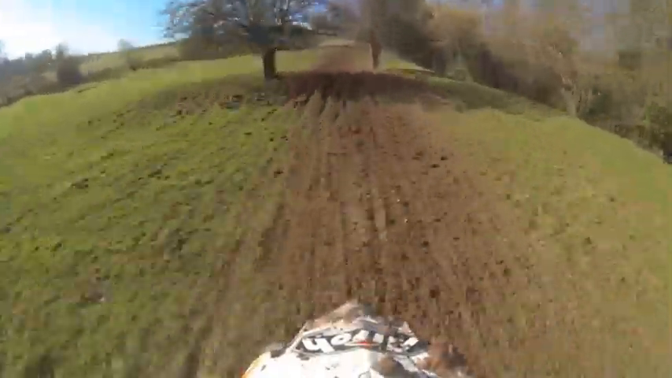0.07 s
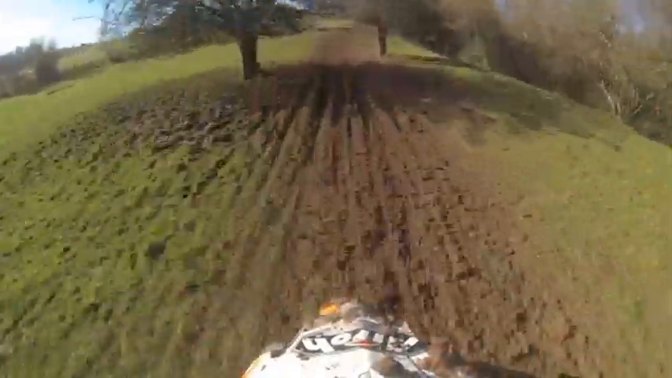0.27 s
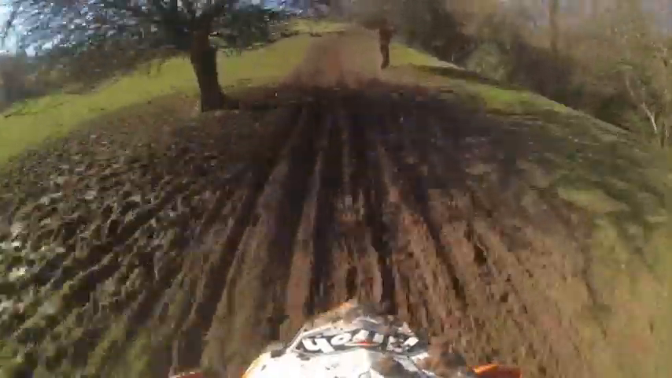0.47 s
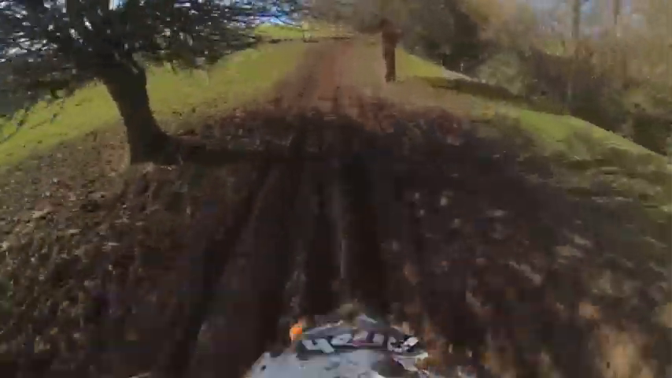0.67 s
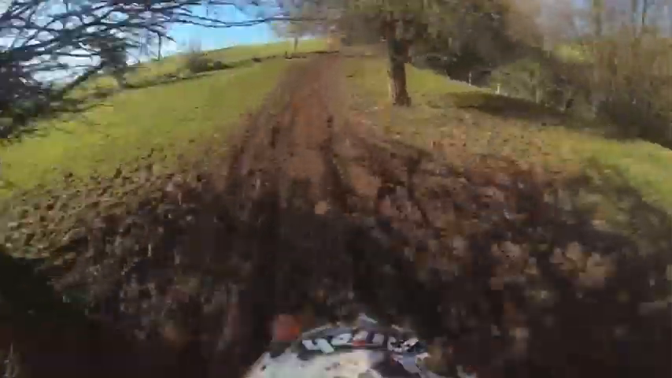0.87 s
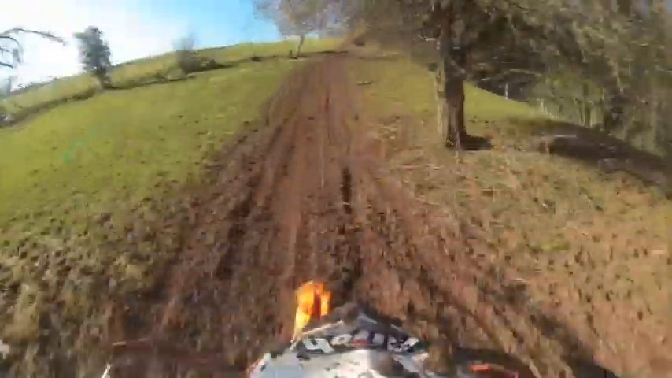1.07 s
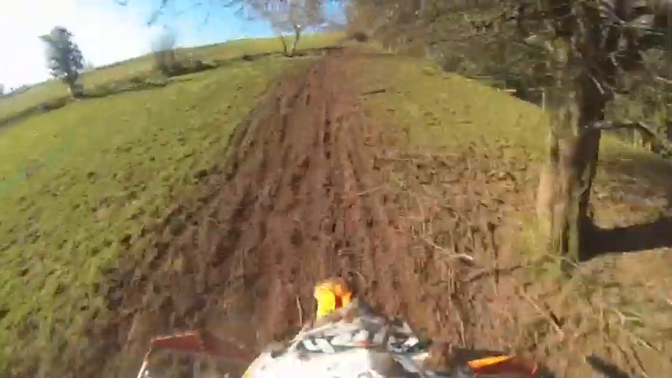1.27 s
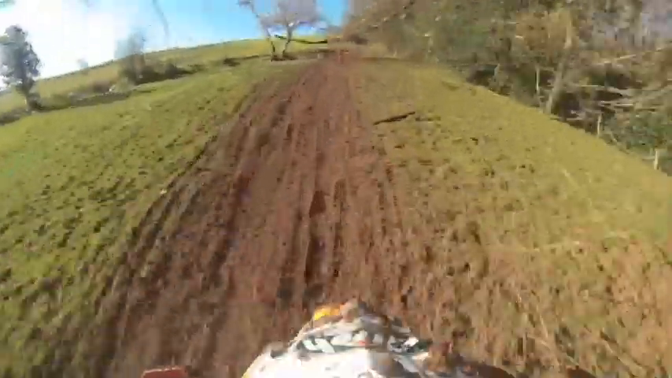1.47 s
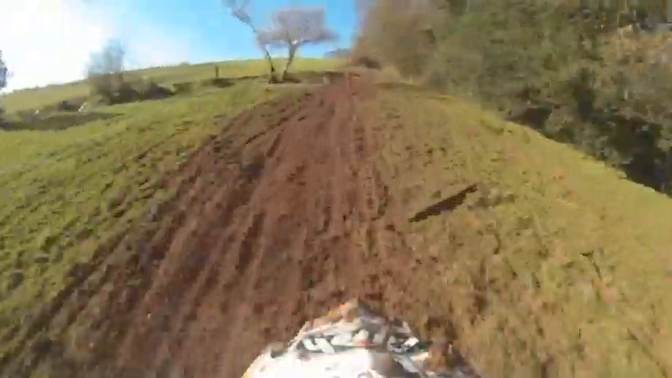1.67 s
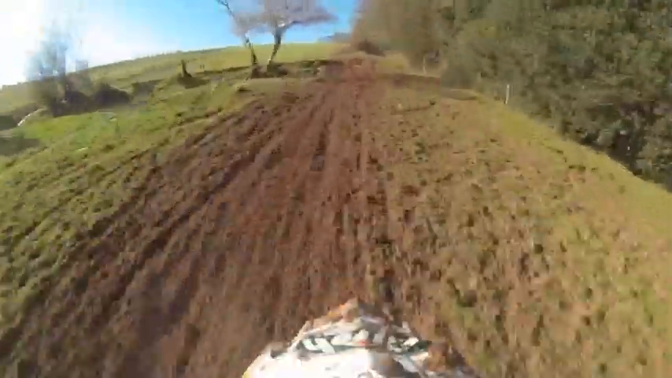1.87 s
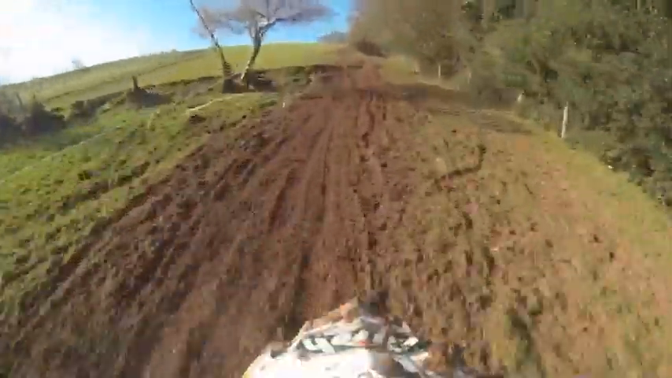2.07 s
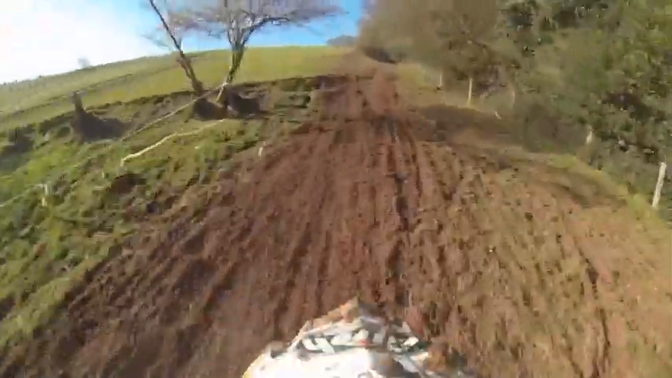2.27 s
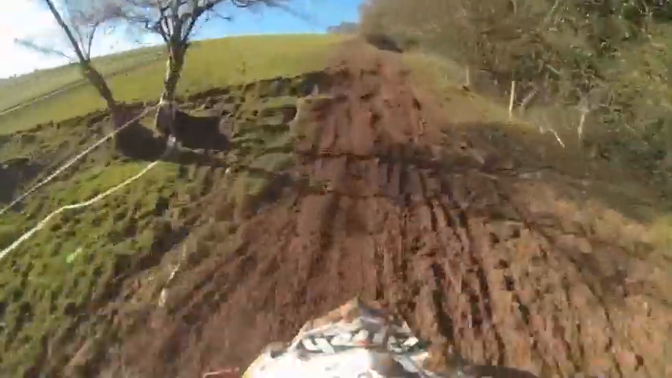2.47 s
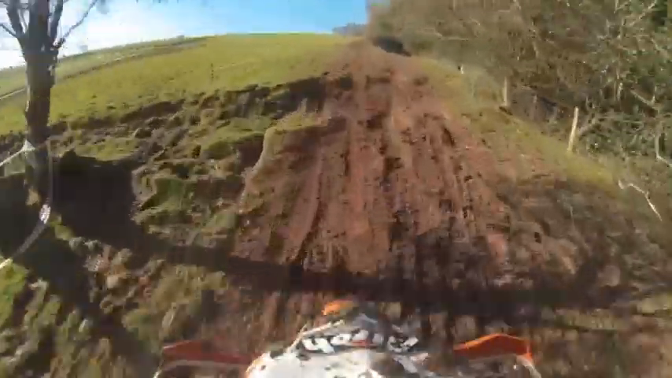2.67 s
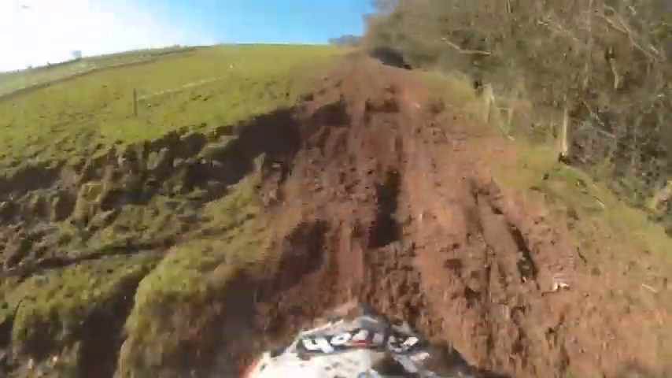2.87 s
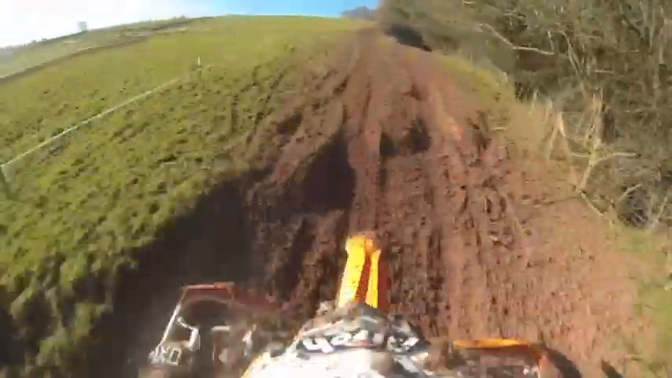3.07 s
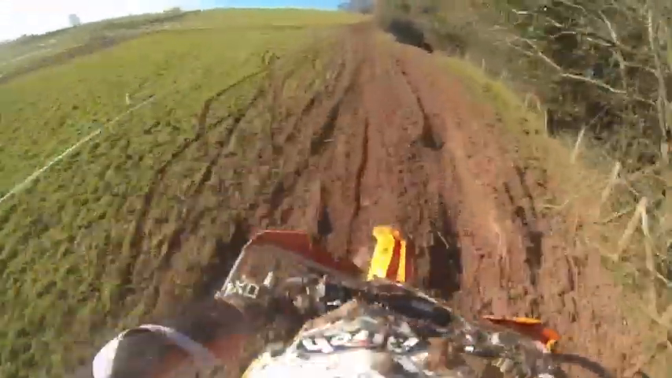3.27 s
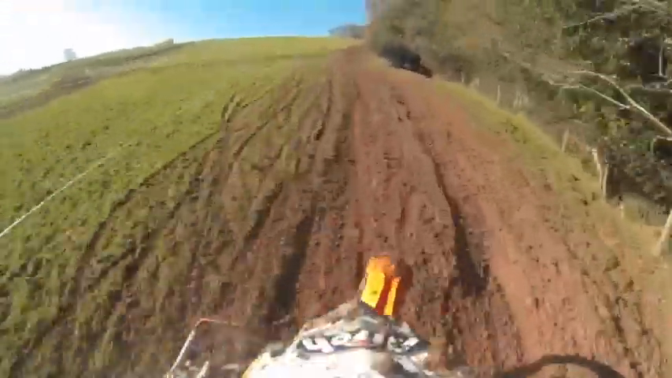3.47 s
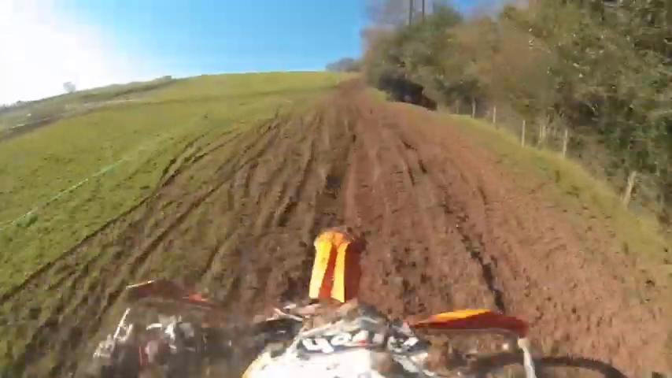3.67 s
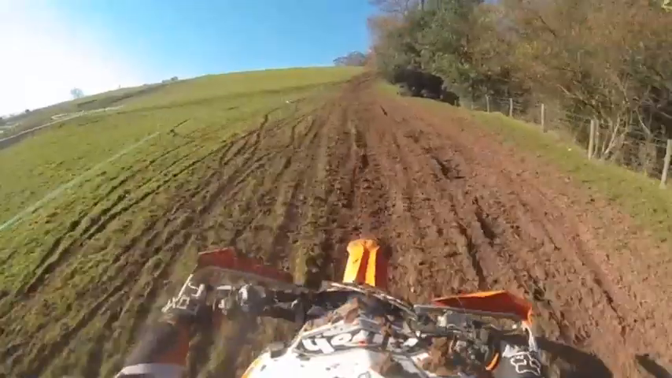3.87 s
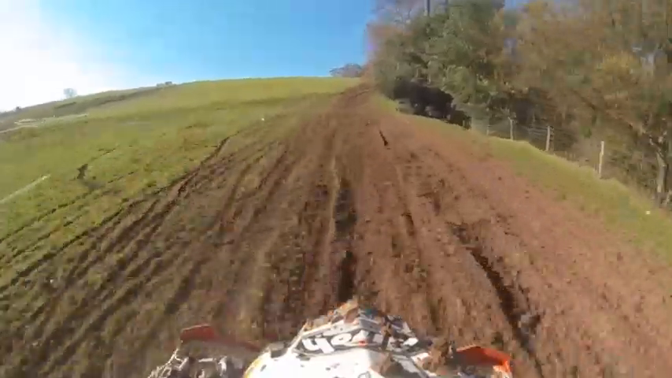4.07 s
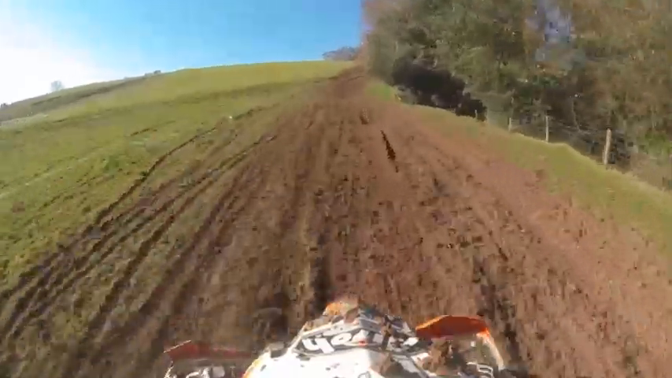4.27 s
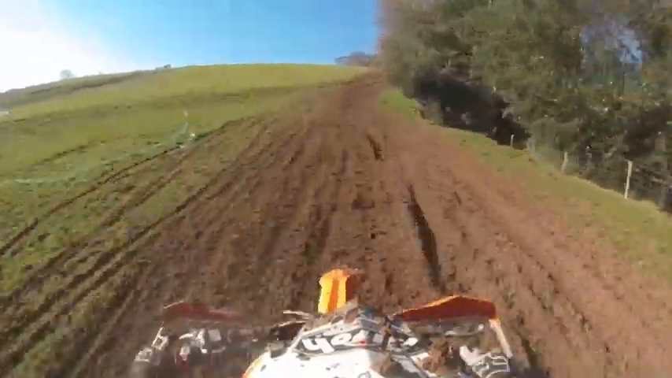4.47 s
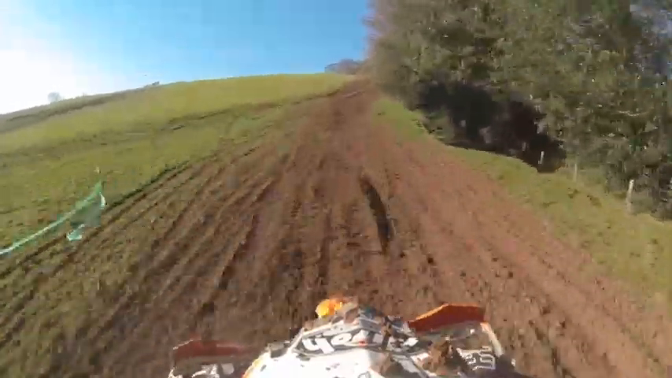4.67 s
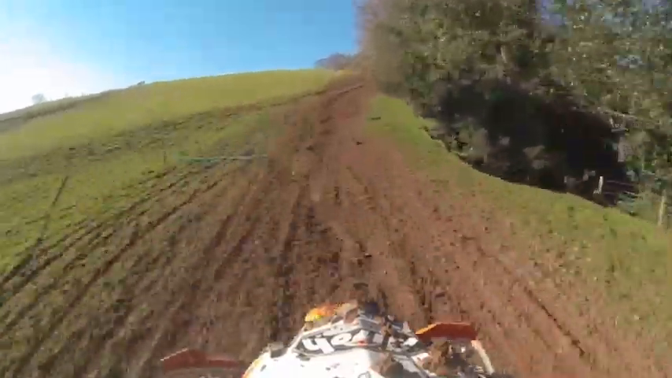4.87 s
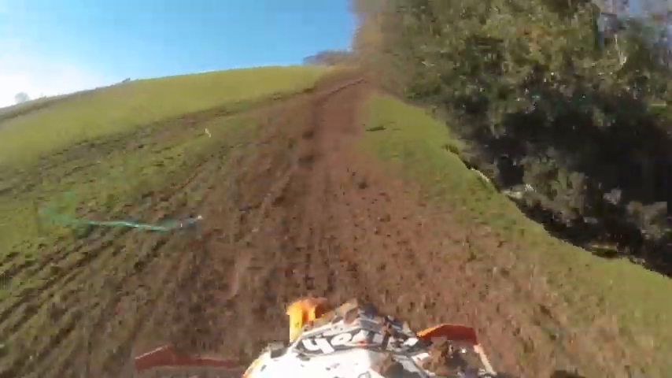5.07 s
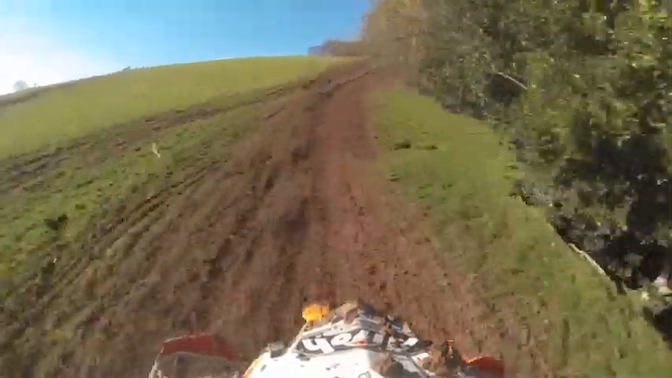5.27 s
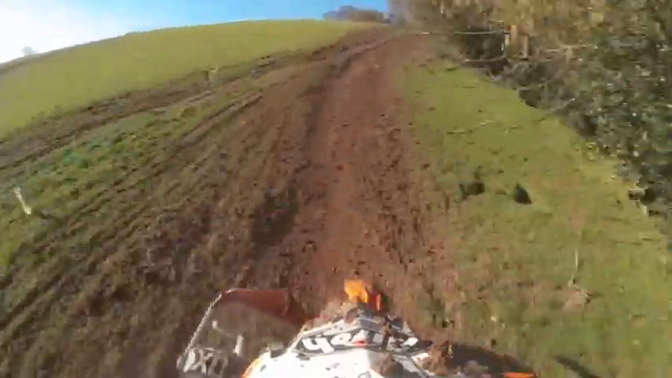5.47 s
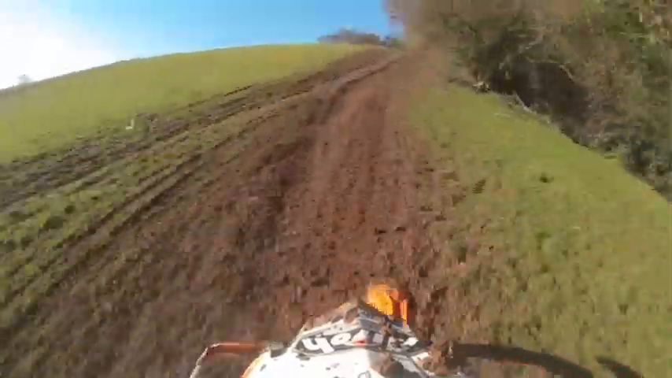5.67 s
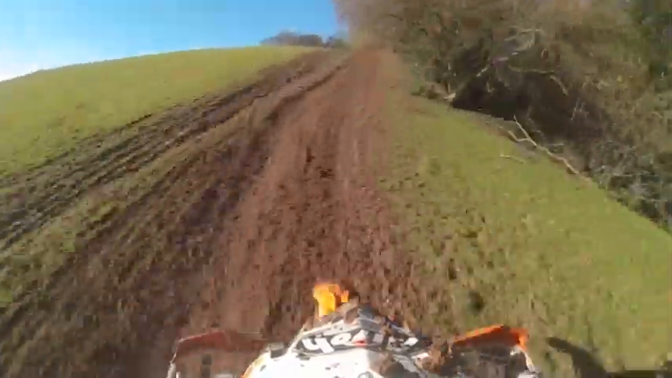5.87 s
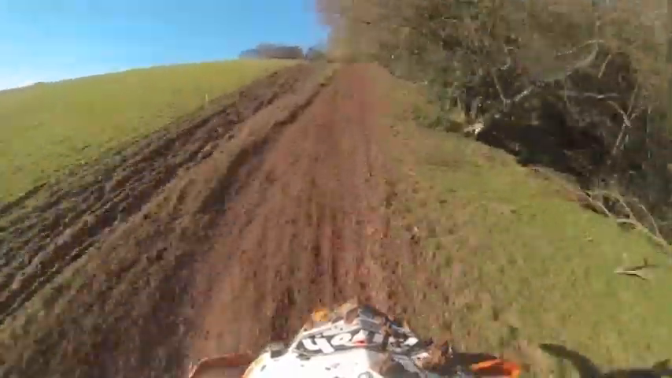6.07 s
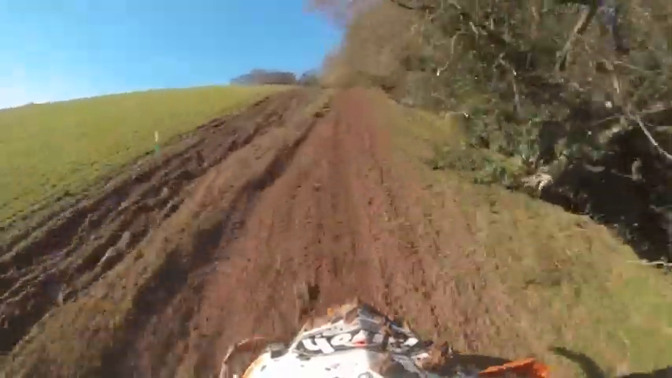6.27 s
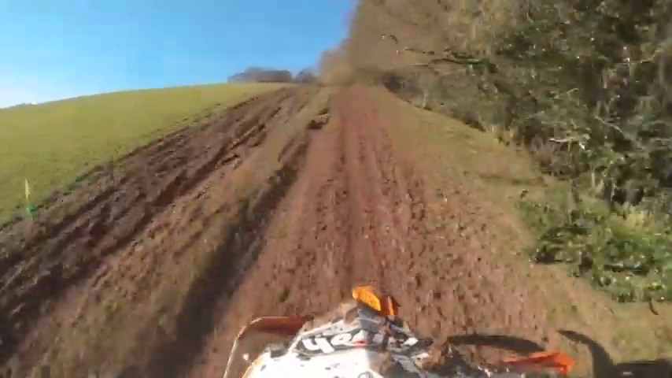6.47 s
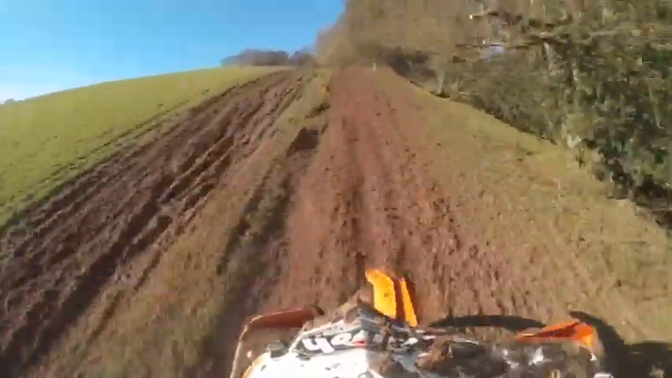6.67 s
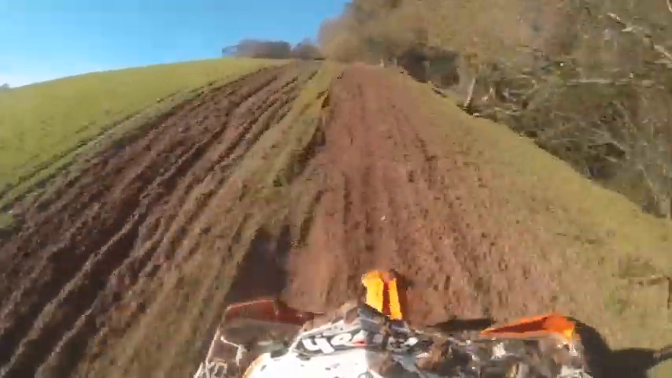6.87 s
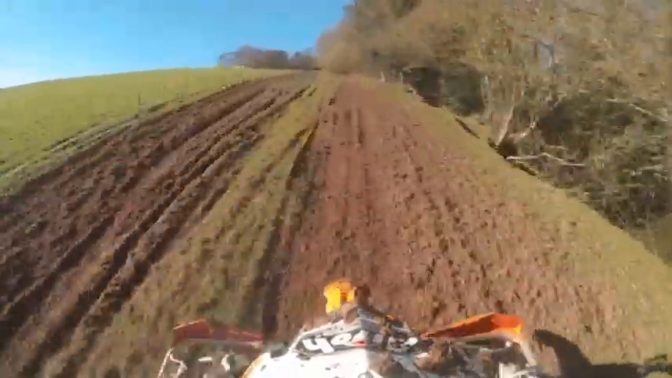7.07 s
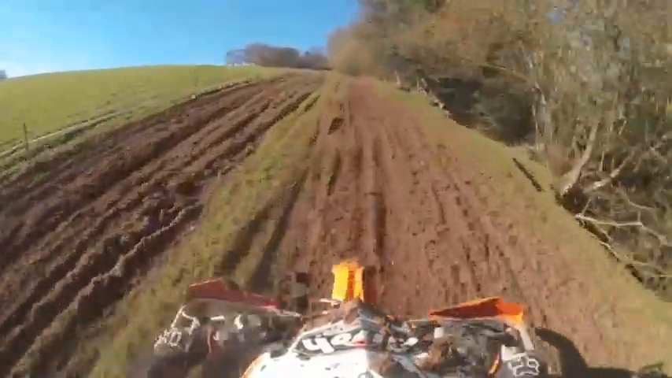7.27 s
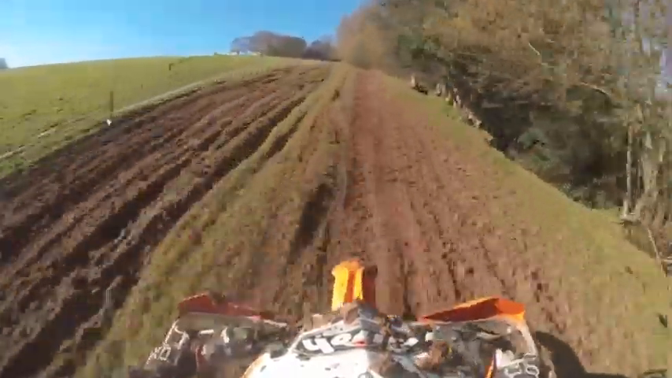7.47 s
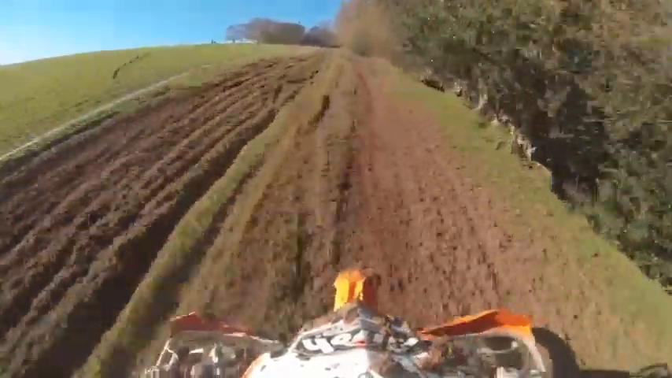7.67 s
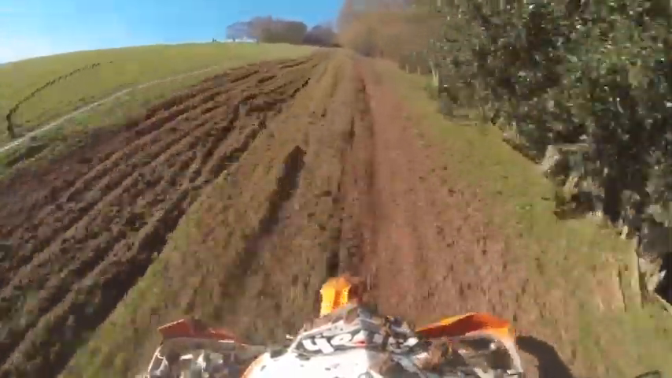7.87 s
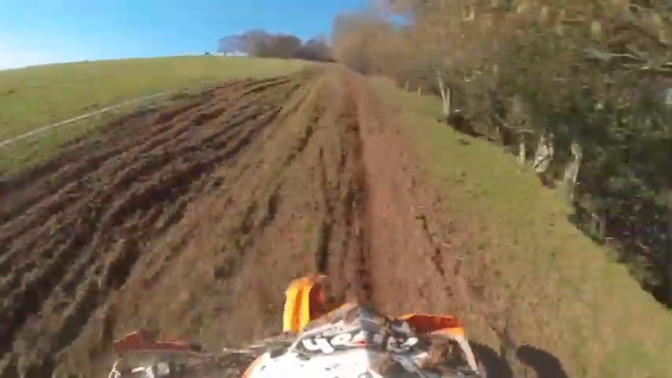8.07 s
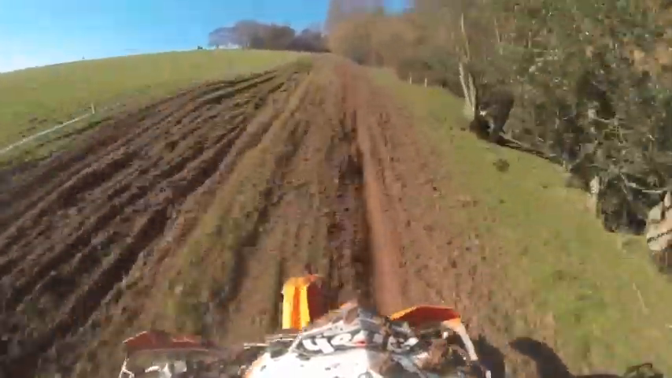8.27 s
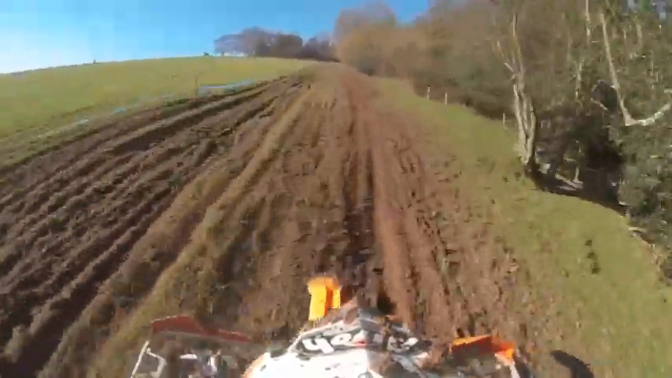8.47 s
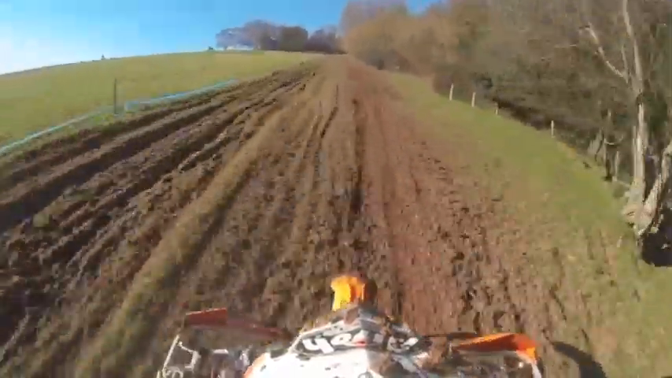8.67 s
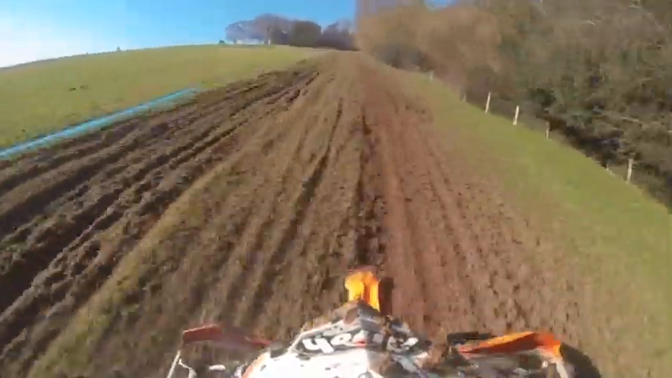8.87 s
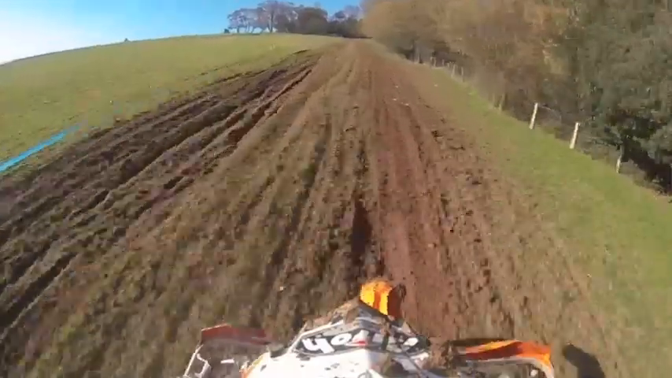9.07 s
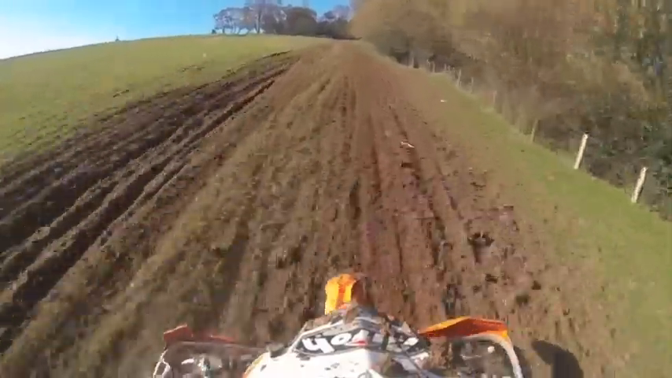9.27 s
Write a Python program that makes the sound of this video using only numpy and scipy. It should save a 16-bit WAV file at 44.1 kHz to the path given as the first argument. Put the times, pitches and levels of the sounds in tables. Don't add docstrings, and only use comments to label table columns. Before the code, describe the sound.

Close, muffled helmet-mounted sound of a four-stroke dirt bike climbing hard, engine flaring over jumps and wheel slips, ruts thumping, two loud clicks.

```python
import sys
import numpy as np
from scipy import signal
from scipy.io import wavfile
from scipy.ndimage import uniform_filter1d, minimum_filter1d

SR = 44100
rng = np.random.default_rng(int(sys.argv[2]) if len(sys.argv) > 2 else 0)


def unload_wav(signal):
    wavfile.write(
        sys.argv[1],
        SR,
        np.round(np.clip(np.atleast_2d(signal).T, -1, 1) * 32767).astype(np.int16),
    )


def field_ratio(decibels):
    return 10 ** (np.asarray(decibels, dtype=float) / 20)


N = 411012

# (time [s], firing rate [Hz])
GRIP_SPEED = [(0, 54.9), (.66, 65.45), (1.17, 65.75), (2.09, 64.67), (2.24, 52.64), (2.6, 54.27),
              (3.14, 57.94), (3.75, 78.17), (4.03, 64.08), (4.3, 59.87), (5.2, 61.35), (5.87, 63.17),
              (6.27, 70.93), (6.35, 65.07), (7.9, 70.5), (8.35, 76.07), (9, 73.95), (9.32, 80.2)]
# (middle [s], extra rate [Hz], half length [s], pointedness [power])
JUMPS = [
    (2.84, 30, .225, 1.35),
    (3.46, 38.5, .26, .7),
]
# (middle [s], extra rate [Hz], half length [s])
SLIPS = [(.57, 5.5, .09), (.78, 7.3, .09), (1.28, 12.5, .1), (1.5, 9, .21), (1.92, 5.5, .08),
         (2.06, 4, .06), (2.35, 5.5, .15), (4.32, 5.7, .07), (4.45, 6, .065), (4.58, 3.7, .075),
         (4.75, 6, .085), (4.92, 6.8, .09), (5.14, 5.1, .07), (5.37, 5.5, .13), (5.57, 14.5, .1),
         (5.7, 16, .11), (6, 6.5, .1), (6.19, 7, .09), (7.03, 4.5, .09), (7.61, 7.5, .07), (7.76, 12, .1),
         (7.98, 8, .07), (8.11, 8.2, .06), (8.24, 6.5, .07), (8.39, 6, .11), (8.59, 6.5, .07),
         (8.72, 8, .08), (8.91, 3.6, .07), (9.08, 8, .09), (9.27, 9.5, .08)]
# (middle [s], extra rate [Hz])
RIDGES = [(.3, 2.75), (1.07, 2.4), (3.84, 2.3), (6.49, 1.36), (6.7, 1.48), (6.831, 2.9), (7.172, 3),
          (7.34, 1.85), (7.499, 1.04)]
# (time [s], share of crack bunched at firings [0-1])
LOAD = [(0, .1), (.52, .15), (.63, .5), (1.5, .55), (1.8, .8), (2.06, .6), (2.12, .05), (2.6, .1),
        (2.9, .5), (3.6, .35), (3.75, .7), (4.1, 1), (5.1, .95), (5.4, .65), (6.8, .55), (7.1, .75),
        (8.1, .75), (9.32, .65)]
# (time [s], level [dB], 0 = open)
THROTTLE = [(0, -16), (.53, -7.5), (.63, -1), (.9, -1), (2.07, 0.2), (2.13, -13), (2.27, -15), (2.32, -3.5),
            (2.56, -17.5), (2.68, -2), (2.87, 5), (3.05, -4), (3.24, -0.5), (4.3, -3), (5.6, 0.5),
            (6.85, 1.5), (8.3, -2), (9.32, 0)]
# (time [s], level [dB])
FACING = [(0, 1), (.45, 3), (.67, 5.5), (.85, 0), (1.5, 4), (2.2, -0.5), (2.7, 6.5), (3.05, 1), (3.45, -.5),
          (3.68, 2.5), (4.4, 0.5), (5.4, -1), (5.68, 0.5), (6.3, -3.5), (7.05, 1), (8.55, -0.5), (9, 0.5),
          (9.32, 0)]
FACING_SHARE = (0.095, 1, 0.6)
# (open level [dB], throttle share [dB/dB], load [dB/unit], speed [dB/octave],
# throttle floor where road noise takes over [dB])
LAYERS = [(-18, 1.33, -3.2, 2.6, -30), (-19.5, 0.35, 0.4, 1.5, -12), (-30, 1.07, 0.1, 0, -2.5)]
# (frequency [Hz], level [dB])
PIPE_OPEN = [(59, -50), (100, -17), (139, -10), (178, -10.5), (214, -2.5), (270, 6.5), (315, -1.5),
             (370, -15.5), (425, -15), (490, -13.5), (620, -22), (735, -29.5), (1000, -30), (1300, -41)]
# (frequency [Hz], level [dB])
PIPE_SHUT = [(59, -44.5), (120, -8.5), (230, 0), (300, -17), (374, 0.5), (487, -7.5), (600, -50),
             (1000, 14.5), (1300, -47)]
# (firing order, extra weight [dB])
ORDER_DB = [(1, -6.5), (2, 4), (3, 3), (4, 1.94), (5, -0.5), (6, 4.5), (7, 1), (8, 3.5), (9, 4), (17, -2.8)]
# (frequency [Hz], density [dB/Hz])
CASE = [(410, -67), (700, -25), (1000, -22), (1230, -8), (1370, -6.5), (1510, 1), (1850, -10),
        (2040, -17.5), (2300, -26), (2990, -30), (5060, -120)]
# (frequency [Hz], density [dB/Hz])
BANG = [(400, -45), (850, -30), (1100, -20), (1400, -6), (1620, 0), (1850, -3), (2250, -24), (2630, -22),
        (2900, -28), (3230, -21), (3900, -28), (5000, -46), (9000, -80)]
# (frequency [Hz], density [dB/Hz])
RASP = [(300, -13.5), (500, -7), (800, -12.5), (2200, 0.5), (2630, 1.5), (2900, -1.5), (3230, 0),
        (3550, -3), (4000, -6), (4450, -16), (6000, -28), (8000, -44), (11000, -55.5), (16000, -94)]
# (time [s], peak [dB], push length [ms])
RUTS = [(0.38, -18, 22), (0.51, -16, 16), (2.878, -20.5, 25), (3.009, -16, 24), (3.106, -12, 17.6),
        (3.716, -11, 21.5), (4.402, -21, 20.1), (4.513, -7, 19.5), (4.663, -6, 13), (4.839, -17, 20.5),
        (5.015, -24, 22), (5.216, -13.5, 20), (5.674, -19.0, 20.4), (6.33, -18, 21), (6.77, -21, 20),
        (7.436, -17.5, 18.5), (7.721, -16, 28), (7.934, -18, 26), (8.071, -19, 19), (8.19, -14.5, 23.4),
        (8.681, -15.5, 20.2), (8.843, -13, 20)]
# (time [s], blow [dB], length [ms], after-swing [dB], swing delay [ms])
TWIGS = [
    (1.5526, .5, 7.6, -12, 9.5),
    (5.7055, -2.3, 4.8, -15, 12.5),
]
# (first [Hz], second [Hz], third [Hz], after-swing [Hz])
WALL = [(3240, 2160, 1130, 86), (2200, 1750, 1500, 104)]
# (frequency [Hz], density [dB/Hz])
TWIG_TICK = [(300, -6), (1100, 0), (3200, -5.5), (5000, -3), (9400, -26.5), (14000, -35.5), (20000, -63)]
# (early start [ms], lasting cut [dB], creep back [s], deep cut [dB])
DUCKS = [
    (19, 9, 1.54, 37),
    (7.9, 7, 0.75, 8),
]
# (frequency [Hz], density [dB/Hz])
WIND = [(12, -15.5), (22, -1.5), (50, -12.5), (92, -7), (115, -16), (200, -18.5), (500, -24.5),
        (1000, -36.5), (2000, -81)]
# (middle [s], level [dB], half length [s])
GUSTS = [(.62, 4.5, 0.091), (0.816, -5.5, 0.16), (2.05, 4.5, 0.11), (2.679, 8, .12), (3.39, 7.5, 0.052),
         (5.646, 7.5, 0.16), (6.569, 6.5, 0.14), (7.621, 3.5, .1), (9.199, -0.5, .15)]
# (frequency [Hz], level [dB])
WHINE = [(6449, -54), (12898, -60)]
# (frequency [Hz], density [dB/Hz])
HISS = [(3000, -31), (4600, -12.5), (4950, 1), (5200, -13), (5600, -23.5), (8000, -35.5), (11000, -50),
        (16000, -81.5)]

LIMIT_HZ = 104.6
MID_LOAD, MID_HZ = .6, 68


def evened(x):
    return x / np.sqrt(np.mean(x ** 2) + 1e-20)


def curve(rows):
    rows = np.asarray(rows, float)
    return np.interp(np.arange(N) / SR, rows[:, 0], rows[:, 1])


def read(points, hz):
    f, value = np.transpose(points)
    return np.interp(np.log(hz + 1), np.log(f + 1), value)


def colour(x, points):
    gain_db = np.maximum(read(points, abs(np.fft.fftfreq(8192, 1 / SR))), -100)
    log_gain = np.log(field_ratio(gain_db))
    taps = np.fft.ifft(np.exp(log_gain - 1j * signal.hilbert(log_gain).imag)).real[:4096]
    return signal.oaconvolve(x, taps)[:len(x)]


def drift(hz):
    lowpass = signal.butter(2, hz, fs=SR, output="sos")
    return evened(signal.sosfilt(lowpass, rng.standard_normal(N)))


def steady(x, span=4410):
    power = uniform_filter1d(uniform_filter1d(x ** 2, span), span)
    return x / np.sqrt(power + 1e-12)


def add(mix, s, sound):
    part = mix[round(s * SR):][:len(sound)]
    part += sound[:len(part)]


def engine():
    hz, load = speed(), np.clip(curve(LOAD), 0, 1)
    turns = np.cumsum(hz * (1 + .003 * drift(30))) / SR
    layers = hum(turns, hz, load), crack(turns, hz, load), rasp(turns, hz, load)
    out = 0
    for layer, settings, facing in zip(layers, LAYERS, FACING_SHARE):
        open_db, share, load_db, octave_db, floor_db = settings
        level_db = open_db + facing * curve(FACING) + share * np.maximum(curve(THROTTLE), floor_db)
        level_db += load_db * (load - MID_LOAD) + octave_db * np.log2(hz / MID_HZ)
        out = out + layer * field_ratio(level_db)
    return out


def speed():
    t, hz = np.arange(N) / SR, curve(GRIP_SPEED)
    skew, ridge_half_s = .3, .075
    bumps = [(*row, 0) for row in JUMPS]
    bumps += [(*row, 2, skew) for row in SLIPS]
    bumps += [(*row, ridge_half_s, 2, skew) for row in RIDGES]
    for s, extra_hz, half_s, power, lean in bumps:
        u = (t - s) / half_s / (1 - lean * np.sign(t - s))
        hz = hz + extra_hz * abs(np.cos(np.pi / 2 * np.clip(u, -1, 1))) ** power
    return np.minimum(hz, LIMIT_HZ + .3 * (hz - LIMIT_HZ))


def hum(turns, hz, load):
    cuts = np.clip(hz - LIMIT_HZ, 0, 1) * drift(19.7)
    bite_db = 1.2 * np.clip(np.gradient(hz) * SR / 100, -2, 2)
    late = turns + 0.031 * cuts - .0005 * hz
    power = np.clip(load / .33, 0, 1)
    bright_db = 18 * (load - .66) + 22 * np.maximum(np.log2(hz / 82), 0)
    lines = 0
    for order in range(1, 18):
        line_hz = order * hz
        weight_db = power * read(PIPE_OPEN, line_hz) + (1 - power) * read(PIPE_SHUT, line_hz)
        weight_db += read(ORDER_DB, order) + bright_db * np.clip(line_hz / 300 - 1.5, 0, 1)
        wander = .07 * np.sqrt(order) * drift(12) + .5 * drift(1.5)
        lines = lines - field_ratio(weight_db + 2.63 * drift(6.4)) * np.cos(2 * np.pi * order * late + wander)
    return steady(lines) * field_ratio(0.27 * 2 * cuts + bite_db)


def crack(turns, hz, load):
    hiss = steady(colour(puffs(turns, hz, .35 * load, fade_ms=14, after_db=-5), CASE))
    return steady(hiss + 1.9 * load ** 1.5 * bangs(turns))


def bangs(turns):
    blur_s, echo_s = .0006, 0.00282
    front = np.diff(turns.astype(int), prepend=0) * field_ratio(1.0 * drift(60))
    tail = signal.lfilter([1], [1, -np.exp(-1 / (blur_s * SR))], front)
    shock = -evened(front) + .3 * evened(tail * rng.standard_normal(N))
    return steady(colour(shock + field_ratio(-20.0) * np.roll(shock, round(echo_s * SR)), BANG))


def rasp(turns, hz, load):
    return steady(colour(puffs(turns, hz, .9 * load ** 2, fade_ms=4, after_db=-12), RASP))


def puffs(turns, hz, load, fade_ms, after_db):
    phase = turns % 1
    puff = np.exp(-1000 * phase / hz / fade_ms)
    puff += field_ratio(after_db) * np.exp(-((phase - .45) / 0.061) ** 2)
    loose = field_ratio(1.0 * drift(66)) * rng.standard_normal(N)
    return np.sqrt(load) * evened(puff * rng.standard_normal(N)) + np.sqrt(1 - load) * evened(loose)


def ruts():
    out = np.zeros(N)
    for s, db, ms in RUTS:
        u = np.arange(-3000, 6000) / SR * 1000 / ms
        push = -1.15 * np.exp(-(u / .4) ** 2)
        push += .55 * np.exp(-((u - .8) / .6) ** 2) + .12 * np.exp(-((u + .9) / .5) ** 2)
        add(out, s - 3000 / SR, field_ratio(db) * push)
    return out


def twigs():
    out, t = np.zeros(N), np.arange(9000) / SR
    for (s, db, ms, swing_db, delay_ms), (*modes_hz, swing_hz) in zip(TWIGS, WALL):
        u = t * 1000 / ms
        shape = np.minimum(u / .1, 1) * np.exp(-u ** 8 * 1.5)
        turns = [np.exp(-((u - .25) / .3) ** 4),
                 .9 * np.exp(-((u - .6) / .17) ** 2),
                 .45 * np.exp(-((u - .85) / .3) ** 2)]
        wall = sum(share * np.sin(2 * np.pi * hz * t) for share, hz in zip(turns, modes_hz))
        tick = evened(colour(rng.standard_normal(len(t)), TWIG_TICK)) * np.exp(-1.5 * u ** 2)
        add(out, s, field_ratio(db) * shape * (wall + .055 * ms * tick))
        glide_hz = swing_hz * (1 - 0.18 * np.exp(-t / 0.015))
        swing = np.sin(2 * np.pi * np.cumsum(glide_hz) / SR)
        add(out, s + delay_ms / 1000, field_ratio(swing_db - 60 * t / 0.19) * swing)
    return out


def duck_db():
    t, out = np.arange(N) / SR, np.zeros(N)
    attack_s, deep_attack_s, deep_release_s = 0.0025, 0.0058, 0.097
    for (s, _, ms, *_), (early_ms, cut_db, creep_s, deep_db) in zip(TWIGS, DUCKS):
        since, behind = t - s + early_ms / 1000, np.maximum(t - s - ms / 1000, 0)
        creep = 1 - np.clip(since / creep_s, 0, 1) ** 2.7
        out -= cut_db * np.clip(since / attack_s, 0, 1) * creep
        out -= deep_db * np.minimum(behind / deep_attack_s, 1) * np.exp(-(behind / deep_release_s) ** 1.44)
    return out


def lift_db():
    lag_s = 0.16
    shut_db, keep = np.maximum(-curve(THROTTLE), 0), np.exp(-1 / (lag_s * SR))
    return 0.36 * signal.lfilter([1 - keep], [1, -keep], shut_db, zi=[shut_db[0]])[0]


def wind():
    t = np.arange(N) / SR
    rumble = colour(field_ratio(1.5 * drift(7.8)) * rng.standard_normal(N), WIND)
    lowpass = signal.butter(4, 2500, fs=SR, output="sos")
    rumble = signal.sosfilt(lowpass, steady(rumble, span=13000))
    jolt_s, slowing_s = 0.017, 4
    jolts = sum(field_ratio(db + 17) * np.exp(-((t - s) / jolt_s) ** 2) for s, db, _ in RUTS)
    gusts_db = sum(db * np.exp(-((t - s) / half_s) ** 2) for s, db, half_s in GUSTS)
    level_db = -33.5 + 0.58 * lift_db() + 6 * np.exp(-(t / slowing_s) ** 4)
    level_db += 1. * drift(1.7) + gusts_db + 3.5 * jolts
    return rumble * field_ratio(level_db)


def camera():
    t = np.arange(N) / SR
    peak_cut_db = 5.5 * (curve(LOAD) - MID_LOAD)
    gain_db = -10 - peak_cut_db + lift_db() + 0.76 * duck_db()
    frames = 48. * t + .54
    gate = np.clip(1.8 * np.cos(2 * np.pi * (frames - .5)) + .2, .1, 1) * field_ratio(1.0 * drift(150))
    flip = np.pi * frames.astype(int)
    whine = 0
    for k, (hz, db) in enumerate(WHINE, start=1):
        whine = whine + field_ratio(db) * np.sin(2 * np.pi * hz * t + k * (flip + .25 * drift(25)))
    hiss = evened(colour(rng.standard_normal(N), HISS))
    return field_ratio(gain_db) * gate * whine + field_ratio(1.08 * gain_db - 42.5) * hiss


def scene():
    ceiling, span = .8, round(.004 * SR)
    ride = (engine() + wind()) * field_ratio(duck_db()) + ruts()
    room = np.minimum(ceiling / (abs(ride) + 1e-9), 1)
    held = uniform_filter1d(minimum_filter1d(room, 2 * span), span)
    return (ride * held + twigs() + camera())[None]


def roll_off(x):
    return signal.sosfilt(signal.butter(12, 15640, fs=SR, output="sos"), x)


def record(dry):
    knee = .9
    over = np.maximum(abs(dry) - knee, 0)
    flat = np.sign(dry) * (np.minimum(abs(dry), knee) + (1 - knee) * np.tanh(over / (1 - knee)))
    trimmed = signal.sosfilt(signal.butter(2, 11000, fs=SR, output="sos"), flat)
    return roll_off(trimmed)


dry = scene()
out = record(dry)
unload_wav(out)
```